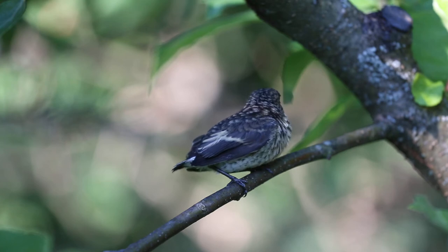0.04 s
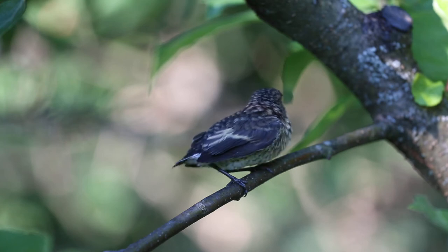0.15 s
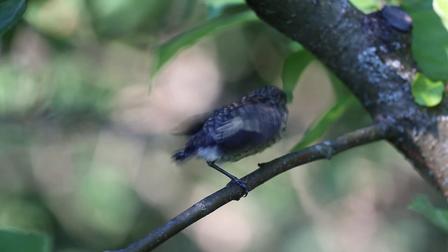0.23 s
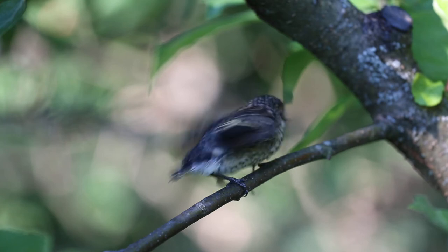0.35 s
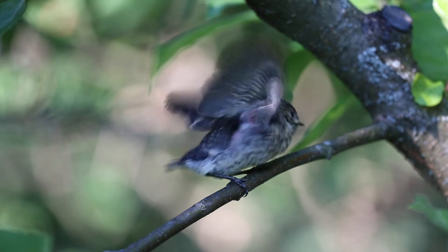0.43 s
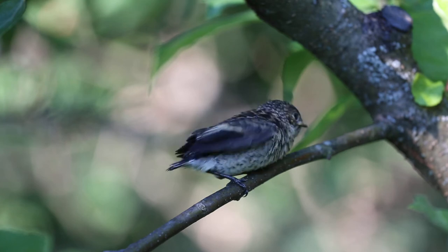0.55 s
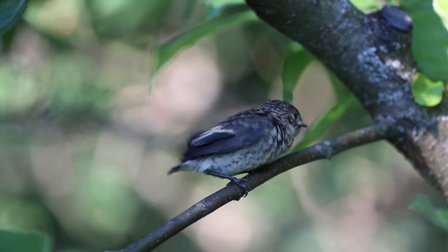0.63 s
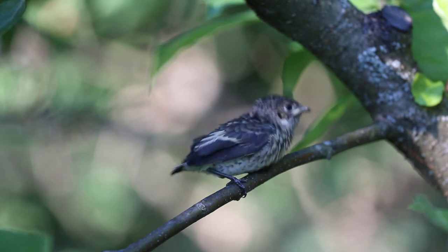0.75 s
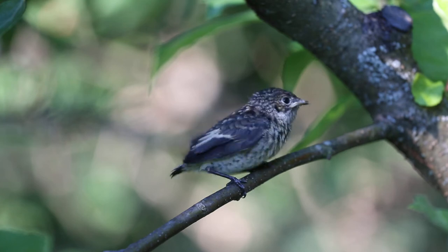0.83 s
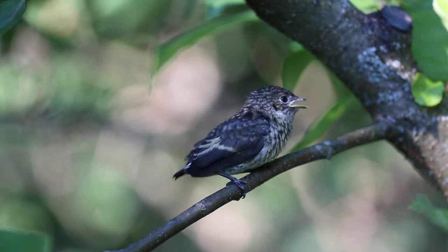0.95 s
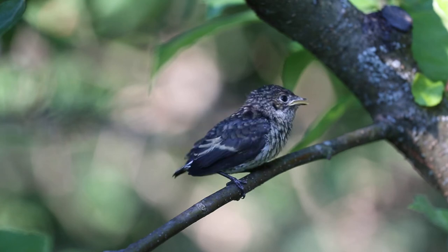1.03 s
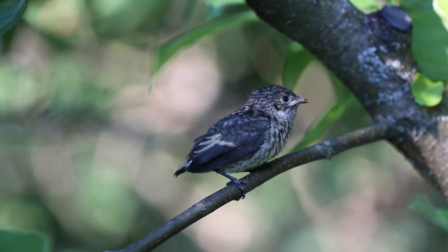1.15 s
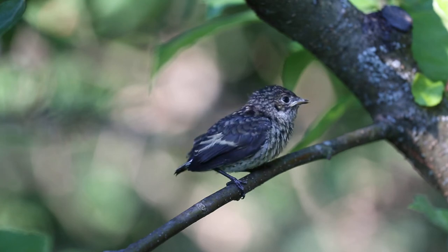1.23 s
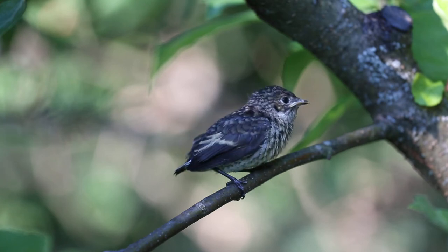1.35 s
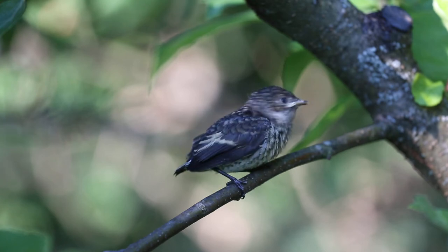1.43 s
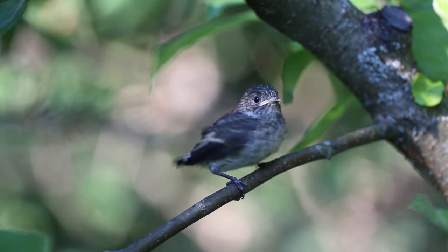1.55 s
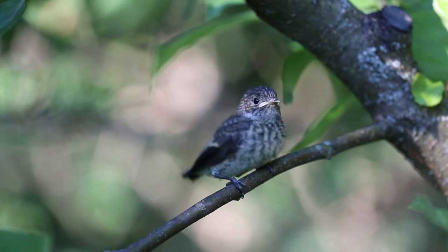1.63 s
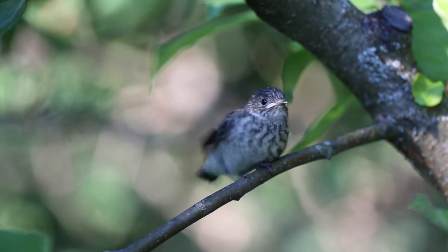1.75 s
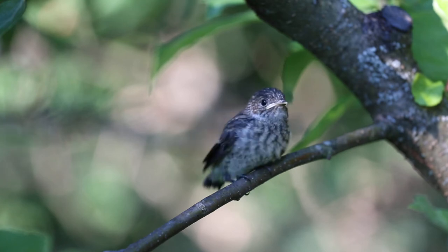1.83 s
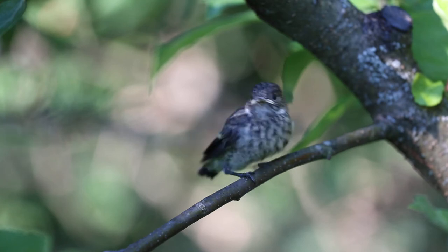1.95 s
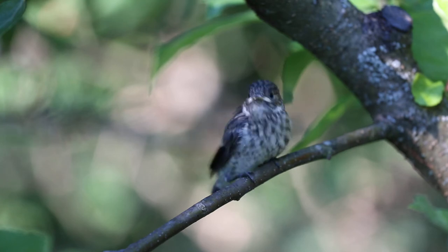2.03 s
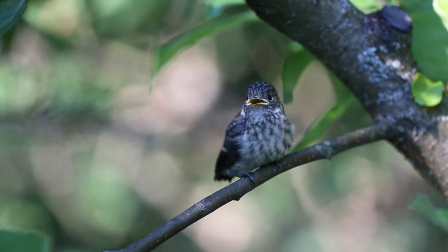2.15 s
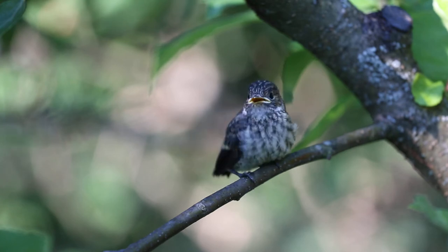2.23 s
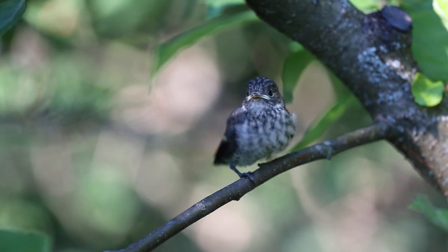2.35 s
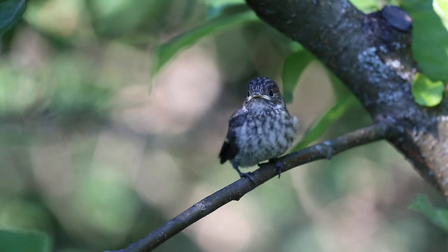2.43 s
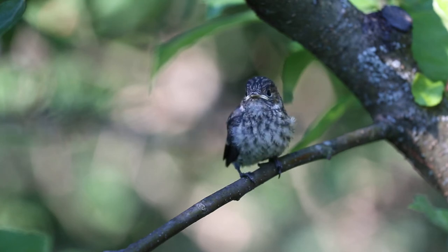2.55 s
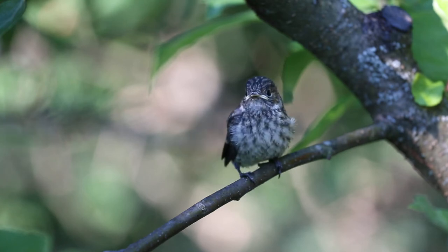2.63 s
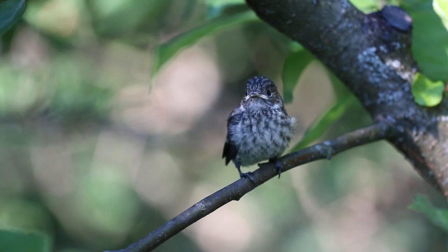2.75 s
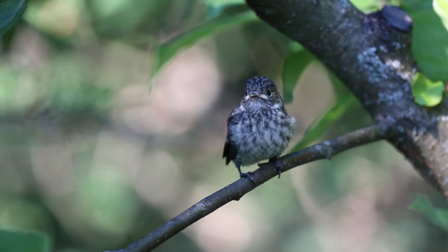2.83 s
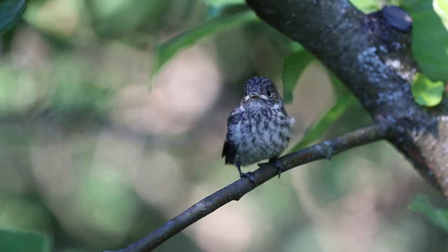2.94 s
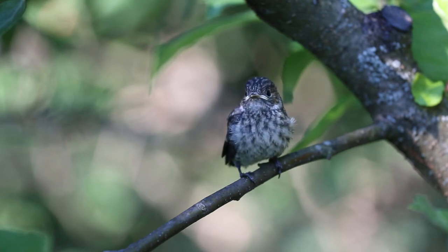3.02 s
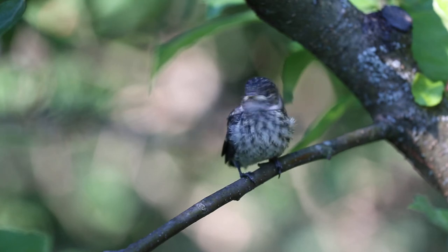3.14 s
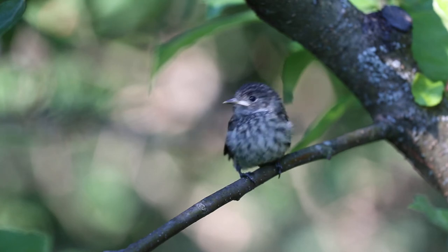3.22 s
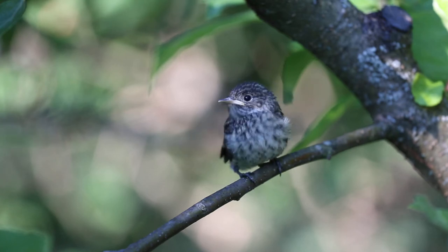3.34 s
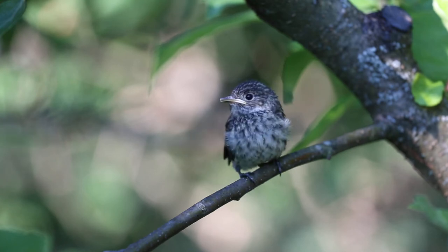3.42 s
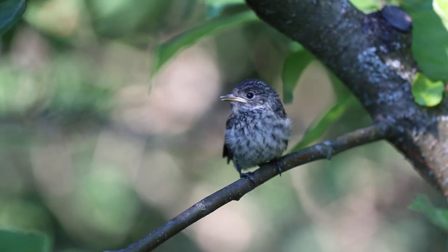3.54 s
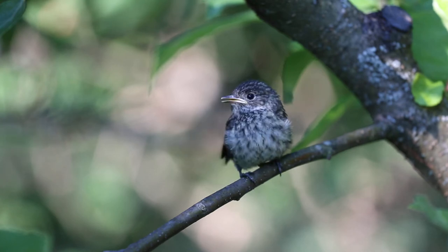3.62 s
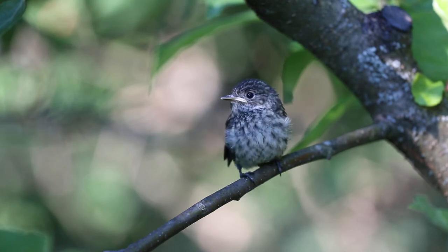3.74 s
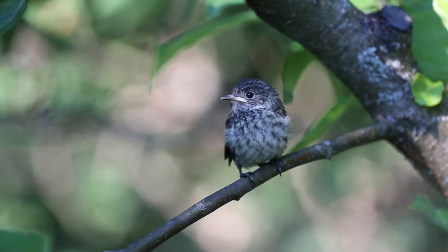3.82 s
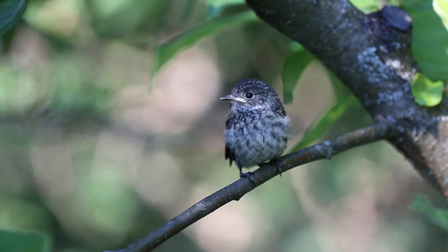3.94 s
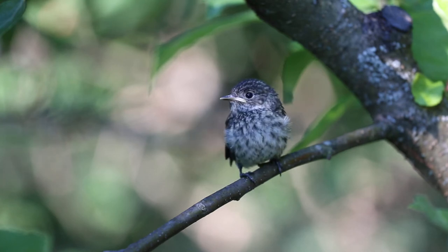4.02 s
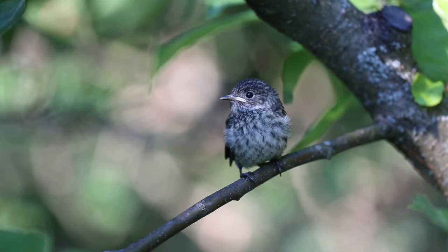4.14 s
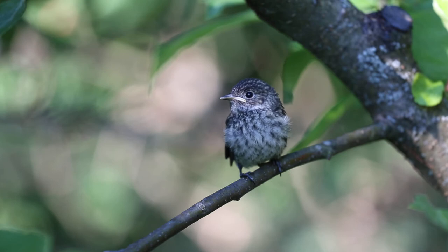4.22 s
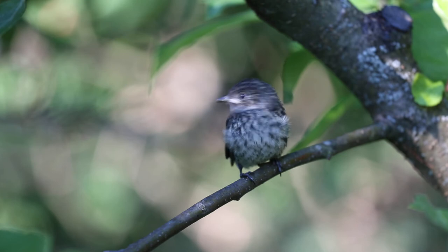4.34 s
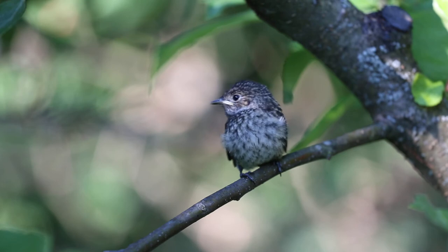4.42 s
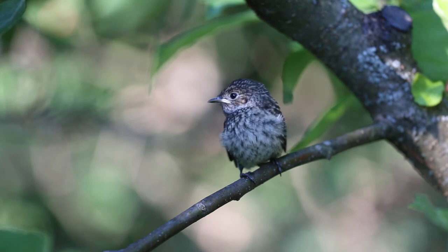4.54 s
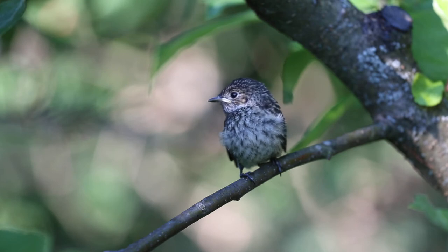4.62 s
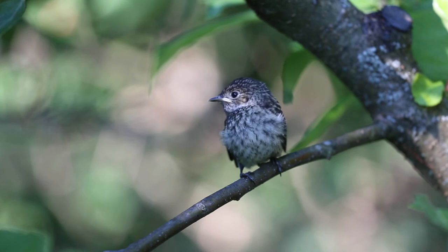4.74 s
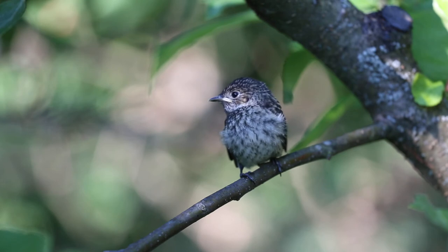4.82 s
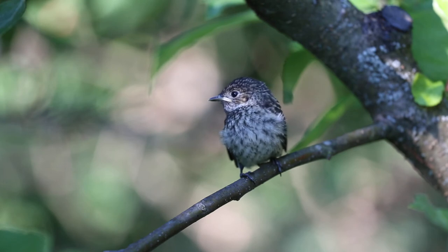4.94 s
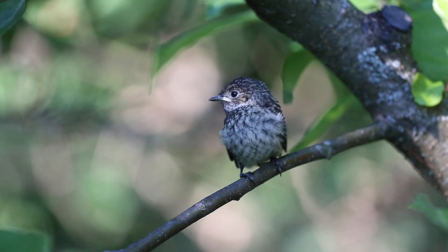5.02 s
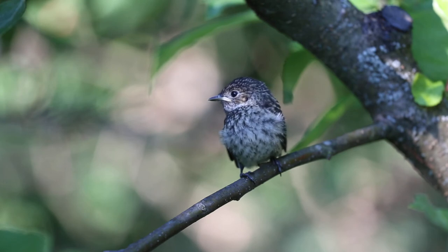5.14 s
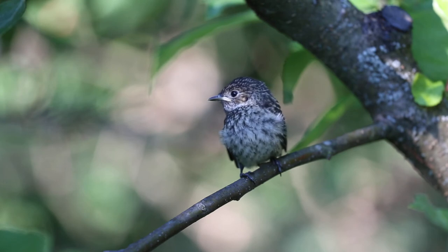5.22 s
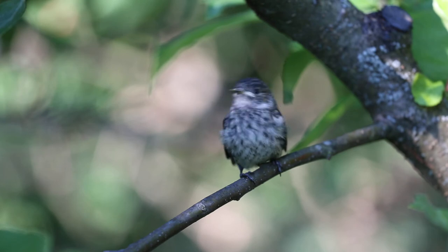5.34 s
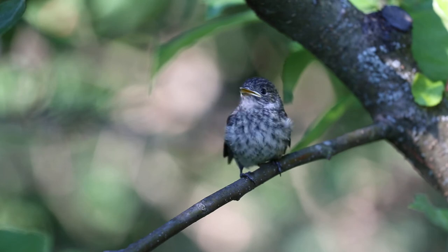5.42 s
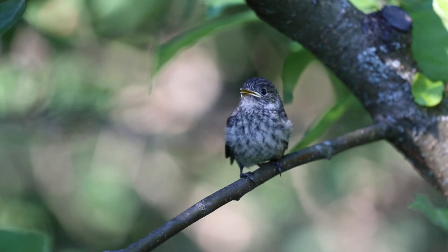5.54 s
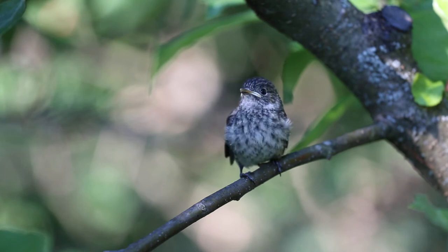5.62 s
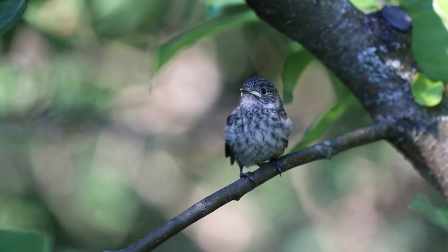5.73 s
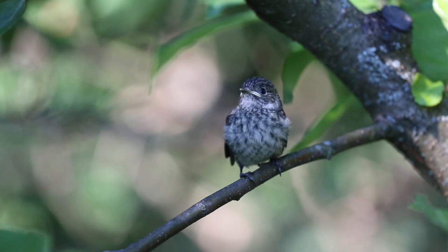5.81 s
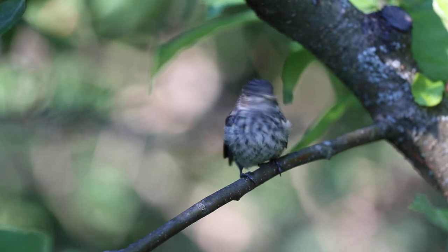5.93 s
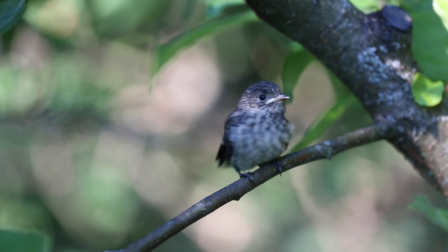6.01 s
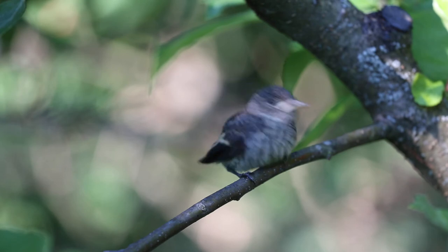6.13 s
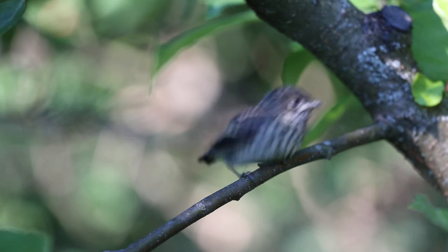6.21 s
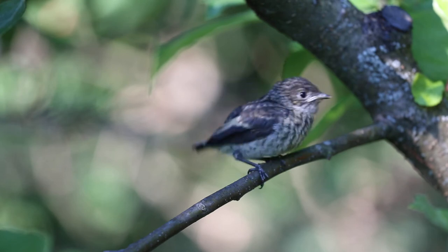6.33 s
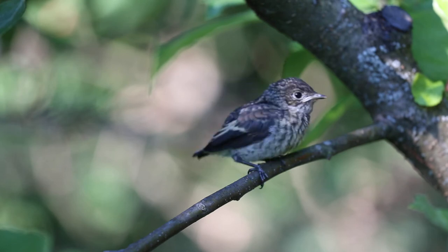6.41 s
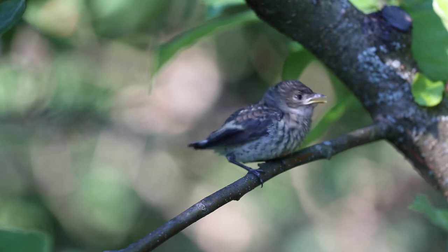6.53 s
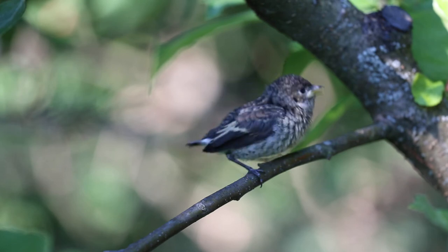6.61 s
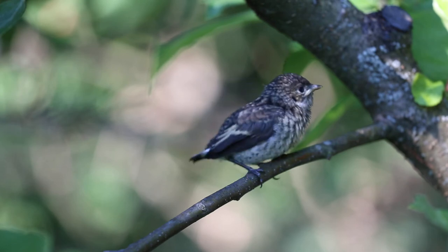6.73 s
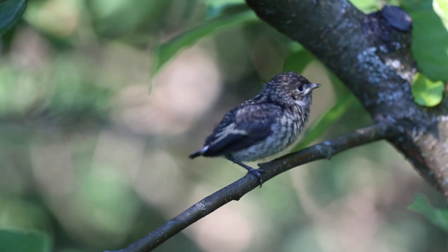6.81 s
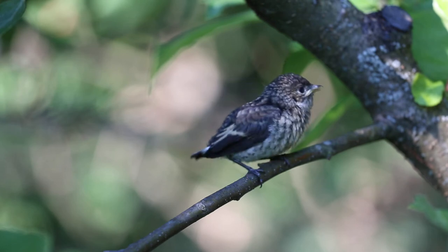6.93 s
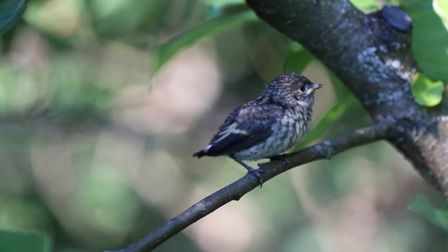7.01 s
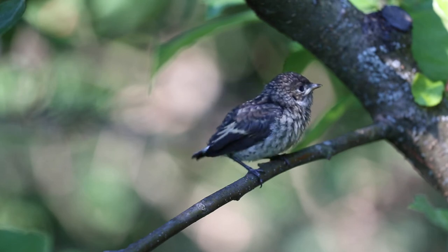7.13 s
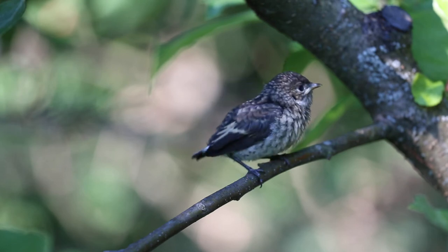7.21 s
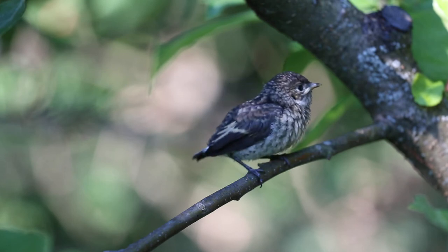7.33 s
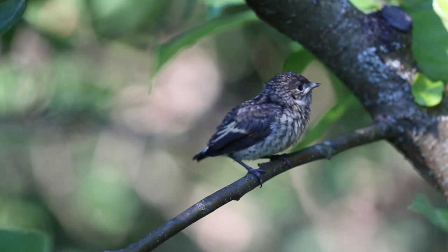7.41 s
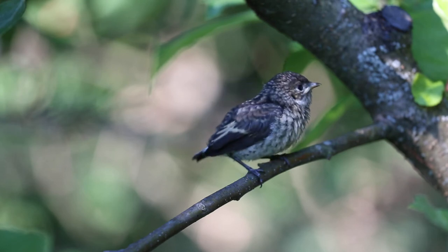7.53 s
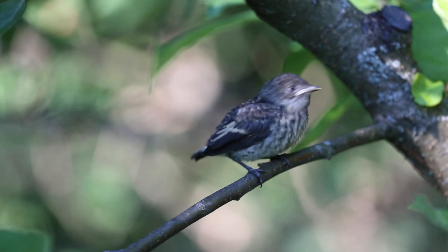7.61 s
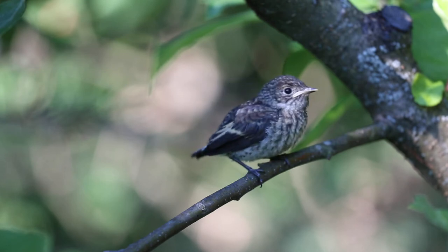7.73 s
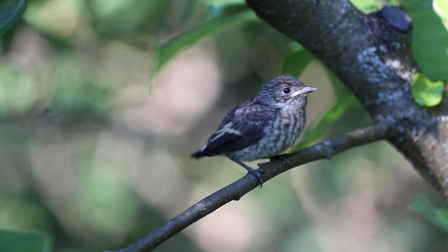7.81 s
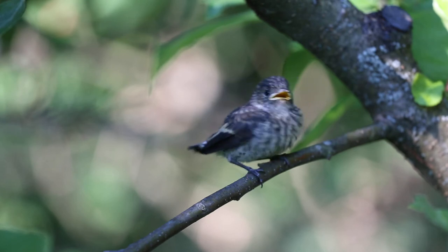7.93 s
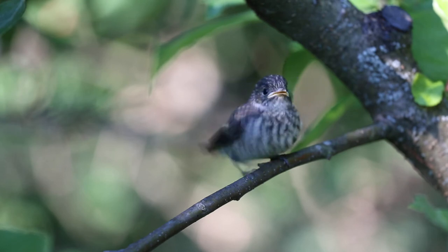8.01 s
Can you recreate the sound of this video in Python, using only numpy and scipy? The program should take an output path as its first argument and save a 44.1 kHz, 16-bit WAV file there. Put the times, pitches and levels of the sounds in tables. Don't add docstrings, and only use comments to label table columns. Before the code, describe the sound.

Woodland ambience with low traffic noise and a faint idling motor. A fledgling's piercing two-toned trill, under a fifth of a second long, sounds six times. After the first comes a faint distant metallic ring; around the second, a warbler's fast twittering, then another singer's blurred slurs. Later, tiny paired chips and a swelling far bird chorus accompany the last calls. The chick is close and crisp, everything else soft and reverberant.

```python
import sys
import numpy as np
from scipy import signal
from scipy.fft import rfft, irfft
from scipy.io import wavfile
from scipy.ndimage import uniform_filter1d

SR = 44100
rng = np.random.default_rng(int(sys.argv[2]) if len(sys.argv) > 2 else 0)


def invert_db(x):
    u = np.asarray(x, float) / 20
    return 10 ** u


def unload_audio(sound):
    columns = np.transpose(np.atleast_2d(sound))
    steps = np.round(np.clip(columns, -1, 1) * 32767)
    wavfile.write(sys.argv[1], SR, steps.astype(np.int16))


N = 355446

# (f/Hz, level per Hz/dB)
FLOOR = [(15, -49), (28, -15), (74, -7), (96, -8.5), (129, -9.5), (189, -3), (241, -5.5), (268, -7.5),
         (391, -1.5), (460, -7), (512, -7), (952, -10), (3770, -20.5), (8690, -23), (15700, -29.5)]
# (t/s, half-width/s,
# swell/dB)
SWELLS = [
    (1.4, 0.22, 2.5),
    (5.85, 0.24, 2.5),
    (6.9, 0.33, 1.5),
]
# (t/s, hum level/dB)
MOTOR = [(0, -68), (.34, -62), (.65, -74), (1.35, -64), (1.6, -74.5), (3.2, -63.5), (4.05, -69),
         (5.25, -59.5), (5.7, -63), (6.8, -59), (8.06, -59.5)]
# (t/s, length/s, start f/Hz, end f/Hz, level/dB)
FAR_CHICKS = [
    (0.112, 0.086, 7650, 8260, -51),
    (4.056, 0.14, 7190, 7255, -47.5),
    (4.357, 0.089, 8700, 8640, -50.5),
    (4.728, 0.094, 8300, 8330, -58),
]
# (t/s, length/s, f/Hz, level/dB)
FAR_WHISTLES = [
    (0.019, 0.097, 4180, -52.5),
    (3.242, 0.049, 4230, -48),
    (3.57, 0.13, 4200, -54),
    (3.34, .12, 4200, -60),
    (5.718, 0.034, 4230, -42.5),
    (5.769, 0.32, 4210, -63.5),
    (6.799, .2, 3800, -59),
]
# (t/s, length/s, start f/Hz, level/dB)
WARBLER_RISES = [
    (1.683, 0.008, 4700, -61),
    (2.47, 0.0093, 4900, -67),
    (1.724, 0.021, 4300, -60),
    (2.24, 0.058, 4390, -56),
    (2.343, 0.029, 4540, -52.5),
    (2.634, 0.04, 4650, -53),
    (3.133, 0.022, 4840, -55),
]
# (t/s, length/s, end f/Hz, level/dB)
WARBLER_DROPS = [(1.635, .016, 5450, -60), (2.042, .006, 5030, -64), (1.75, 0.013, 4600, -56),
                 (3.065, 0.0072, 4600, -56), (1.716, .006, 4900, -62), (2.424, 0.012, 5320, -50),
                 (2.62, 0.0078, 4830, -55), (2.665, .024, 3820, -60), (2.753, .007, 4600, -55.5),
                 (2.872, .005, 4740, -57), (3.154, 0.031, 3980, -57.5)]
# (t/s, length/s, foot f/Hz, level/dB)
WARBLER_ARCHES = [
    (1.964, .032, 4830, -57),
]
# (t/s, length/s, start f/Hz, end f/Hz, level/dB)
WARBLER_HOOKS = [
    (2.062, 0.042, 4500, 3550, -59),
    (2.514, 0.045, 4400, 3280, -61),
    (2.759, .042, 4640, 3950, -60),
]
# (t/s, length/s, start f/Hz, end f/Hz, level/dB)
WARBLER_SLURS = [(.162, 0.041, 3160, 2100, -59), (2.601, .011, 3080, 2700, -62),
                 (2.929, 0.022, 3730, 3130, -65), (2.6, .018, 6650, 6250, -59.5),
                 (3.013, 0.027, 3780, 3130, -61), (3.047, 0.014, 6570, 5900, -61),
                 (1.863, 0.013, 5450, 5650, -57), (1.7, .045, 5300, 5200, -66.5),
                 (1.667, .012, 4200, 4100, -64), (1.925, .013, 6300, 6750, -67),
                 (2.03, .014, 5720, 5800, -66.5), (3.039, .008, 3700, 4250, -64),
                 (3.21, .028, 4900, 4750, -66), (1.763, .012, 4550, 4550, -66),
                 (3.18, 0.018, 3600, 3200, -60), (1.915, 0.013, 2800, 3100, -66),
                 (1.69, 0.014, 6250, 6200, -68), (3.3, .008, 6300, 6700, -62),
                 (5.2, 0.013, 3500, 3500, -65), (3.099, 0.028, 3450, 3100, -63),
                 (3.084, 0.012, 5200, 4800, -55), (3.094, 0.019, 4800, 3900, -61),
                 (2.549, 0.022, 3150, 2800, -64)]
# (t/s, length/s, start f/Hz, level/dB)
WARBLER_FLICKS = [
    (2.879, 0.0294, 4700, -55.5),
]
# (t/s, gap/s, first level/dB, second level/dB, third over second harmonic/dB)
CHIPS = [
    (0.346, .048, -62.5, -61, 4),
    (.779, 0.058, -64, -64.5, 6),
    (4.53, .047, -61, -59.5, -3.5),
    (4.758, 0.052, -56.5, -57.5, -1),
    (5.187, 0.048, -56, -57, 3),
    (6.51, 0.048, -59, -59, 3),
    (6.997, .048, -59, -57.5, -3),
    (7.46, 0.051, -58, -60, -2.5),
    (7.855, 0.057, -57.5, -57.5, -3),
]
# (f/Hz, width/Hz, level/dB)
THROAT = [
    (6820, 650, 5.5),
    (7850, 1500, -2.5),
]
# (t/s, effort/dB, crest f/Hz, extra push of the high voice/dB)
EFFORT = [
    [(.912, -27.5, 7800, 8), (.928, -22, 7170, -0.5), (.948, -17, 7110, -0.5), (.972, -14, 7000, -3.5),
     (.999, -19, 6960, 2.5), (1.029, -19, 6840, -2), (1.06, -22.5, 6860, -1), (1.09, -26.5, 6360, -7)],
    [(2.152, -24, 8100, 2), (2.17, -17.5, 7290, 2), (2.189, -17.5, 7090, 0.5), (2.214, -15, 7110, 2.5),
     (2.242, -18, 6900, 2), (2.272, -20, 6990, -3.5), (2.304, -25, 6920, -5), (2.333, -20, 6290, -13)],
    [(3.574, -23, 8150, -1.5), (3.593, -26, 7340, -1.5), (3.609, -26, 7200, -1.5), (3.633, -24.5, 6990, 0),
     (3.654, -25.5, 7060, 1.5), (3.684, -25.5, 7050, -3), (3.713, -33, 6730, 0.5), (3.739, -29, 6350, -7)],
    [(5.433, -26, 8300, 4.5), (5.453, -24.5, 7350, -1), (5.475, -21.5, 7300, 1.5), (5.501, -17.5, 7020, 2),
     (5.527, -20, 7060, 2), (5.556, -20.5, 7030, -2.5), (5.587, -27, 6790, 0), (5.625, -34.5, 6430, -3)],
    [(6.549, -27, 8300, 2.5), (6.57, -18, 7340, -3), (6.593, -20, 7240, -1.5), (6.615, -23, 7200, 1.5),
     (6.644, -23.5, 6990, 0.5), (6.678, -30, 6800, -2), (6.698, -24.5, 6400, -5)],
    [(7.885, -15.5, 7920, 0), (7.902, -16.5, 7250, -6.5), (7.923, -15, 7210, -1), (7.949, -15, 7080, 2),
     (7.977, -15, 6960, -1.5), (8.008, -18.5, 6970, 0), (8.042, -26.5, 6780, -1), (8.062, -20.5, 6350, -7)],
]
# (first dip f/Hz, high over low voice ratio, high minus low/dB, octave tones/dB, difference tones/dB)
CALL_VOICES = [
    (6606, 1.173, -5.5, -32, -36.5),
    (6540, 1.169, -2.5, -36, -30),
    (6610, 1.156, -0.5, -26, -27.5),
    (6707, 1.144, -1.1, -31, -35),
    (6790, 1.152, -1, -28, -39),
    (6643, 1.135, -2, -34.5, -33.5),
]
# (low voice slackens in dips/dB, high voice/dB, fade on glides/dB, dips sink/Hz per s)
BREATH = [
    (9, 3, 2, 900),
    (11, 7, 2, 500),
    (2, 3, 9, 700),
    (9, 6, 2.5, 600),
    (2, 4, 3, 1500),
    (5, 2, 4, 800),
]
PIPE_HZ = [883, 1410, 1475, 1841, 2051, 2815, 2864, 3381, 3418, 3731, 4382, 4392, 5663, 5916, 5901, 7052,
           7860, 8177, 8185.5, 10450, 10500, 10590]
# (t/s, swell/s, steepness, peak level/dB)
PIPE = [(1.2, 0.15, 0.92, -61.5), (1.34, 0.067, 0.64, -63), (1.34, 0.061, 0.55, -60), (1.35, 0.11, .8, -66),
        (1.34, 0.053, 0.73, -56.5), (1.385, 0.047, 1.1, -58), (1.385, 0.05, 1.1, -55),
        (1.34, .06, 1.1, -60), (1.34, 0.087, 1.6, -55), (1.348, 0.079, 0.87, -47.5),
        (1.36, 0.036, 1.3, -50.5), (1.35, 0.12, 0.92, -60), (1.35, 0.09, 1.5, -48.5),
        (1.34, 0.09, 1.7, -36.5), (1.34, 0.056, 1.6, -44), (1.36, 0.085, 1.1, -41.5),
        (1.34, 0.044, 0.88, -52), (1.29, .16, 3, -49), (1.29, .16, 3, -51), (1.38, 0.055, 1.6, -61),
        (1.41, 0.045, 1.3, -57), (1.7, 0.051, 1.9, -73)]
# (f/Hz, level/dB)
ROD = [(882.9, -73), (4587, -63), (5319, -62), (5421, -56.5), (6541, -70.5), (6735, -74.5), (6853, -73.5),
       (7176, -70), (7822, -71), (7843, -65), (10395, -74), (11639, -73), (14616, -73), (15143, -76)]
# (t/s, level/dB, centre f/Hz, spread of pitch as a share)
CHORUS = [(1.5, -83, 5310, .12), (1.7, -58, 5221, .12), (2.6, -58.5, 4613, .15), (3.4, -58, 3432, .18),
          (3.9, -62, 3000, .18), (4.5, -72.5, 2887, .15), (6.7, -65, 3880, .06), (6.95, -57, 3800, .08),
          (7.2, -56, 3202, .22), (7.55, -52, 4410, .18), (7.78, -48.5, 4916, .12), (7.85, -46, 3797, .12),
          (8.06, -50.5, 4040, .17)]
# (t/s, f/Hz, time to fall 60 dB/s, level/dB)
TICKS = [
    (7.8, 130, .25, -46),
    (2.219, 4800, .004, -33),
    (2.171, 10000, .003, -36),
    (6.715, 830, .12, -52),
    (5.99, 860, .15, -54),
    (6.04, 760, .15, -54),
]
# (t/s, length/s, start f/Hz, end f/Hz, level/dB)
FAR_HOOKS = [
    (4.085, 0.032, 4460, 4170, -67),
]
# (t/s, length/s, start f/Hz, end f/Hz, level/dB)
FAR_SLURS = [(3.22, .021, 3530, 2670, -62.5), (3.256, 0.032, 4500, 2650, -61.5),
             (3.377, 0.029, 3100, 3940, -62.5), (3.422, 0.0217, 3100, 2500, -67),
             (3.463, .03, 3300, 3150, -66), (3.85, .05, 2600, 3400, -69.5), (3.612, .022, 3100, 2100, -69),
             (3.808, .018, 2950, 2100, -62.5), (3.445, .024, 2150, 3300, -64.5),
             (3.4, 0.039, 3850, 3520, -68), (3.765, 0.02, 2950, 3850, -61),
             (3.579, 0.0187, 3200, 4050, -60.5), (3.596, 0.018, 4500, 3170, -63),
             (3.627, .039, 2080, 3810, -63), (3.66, .012, 3100, 2200, -68), (3.67, 0.014, 2900, 3400, -69),
             (3.695, .015, 3200, 3100, -73), (3.788, 0.021, 3850, 2900, -60),
             (3.683, 0.011, 4580, 4000, -56), (3.825, .037, 2100, 3450, -66),
             (3.87, 0.057, 3620, 2410, -80), (4.03, 0.045, 2560, 3320, -74),
             (4.089, 0.028, 3190, 2200, -67), (4.2, 0.065, 3950, 2500, -66.5),
             (4.05, 0.044, 2950, 3100, -68), (4.26, .03, 2450, 2150, -65), (4.3, 0.037, 2350, 2060, -67.5),
             (3.69, .02, 3300, 3300, -72)]
# (lowest f/Hz, extra loudness needed/dB)
MASKED = [
    (9450, 3),
    (9800, -2),
    (10150, -1),
    (10500, 1.5),
    (10850, 4),
    (11200, 6),
]
# (t/s, lowest f hit/Hz, share of bands lost)
STARVED = [(.5, 1500, .5), (.52, 1000, .7), (.735, 1800, .4), (1.1, 1800, .9), (1.116, 1800, .9),
           (6.549, 11500, .4), (2.635, 1400, .6), (3.4, 2000, .45), (3.786, 1500, .45), (3.915, 1500, .6),
           (4.0, 1200, .55), (4.3, 1200, .5), (4.72, 2000, .55), (6.345, 1500, .55), (6.39, 2500, .4),
           (6.92, 1500, .5), (7.24, 1800, .5), (7.325, 2200, .45), (8.03, 500, .6)]


def rms_one(x):
    return x / np.sqrt(np.mean(x ** 2) + 1e-20)


def in_time(rows):
    s, *columns = np.transpose(rows)
    return [np.interp(np.arange(N) / SR, s, c) for c in columns]


def drift(rate):
    r = np.exp(-2 * np.pi * rate / SR)
    noise = rng.standard_normal(N + SR)
    return rms_one(signal.lfilter([1], [1, -2 * r, r * r], noise)[SR:])


def add(out, s, sound):
    i = round(s * SR)
    out[i:i + len(sound)] += sound[:N - i]


def turns(hz):
    return 2 * np.pi * np.cumsum(hz) / SR


def filtered(x, order, hz, kind="low"):
    return signal.sosfilt(signal.butter(order, hz, kind, fs=SR, output="sos"), x)


def resonance(x, hz, width_hz):
    r = np.exp(-np.pi * width_hz / SR)
    poles = [1, -2 * r * np.cos(2 * np.pi * hz / SR), r * r]
    return signal.lfilter([(1 - r * r) / 2, 0, (r * r - 1) / 2], poles, x + 1e-18)


def ring(clicks, hz, t60):
    r, w = invert_db(-60 / (t60 * SR)), 2 * np.pi * hz / SR
    return signal.lfilter([0, np.sin(w)], [1, -2 * r * np.cos(w), r * r], clicks + 1e-18)


def trees(x, onset_s, t60):
    t = np.arange(SR) / SR
    tail = rng.standard_normal(SR) * invert_db(-60 * t / t60) * (1 - np.exp(-t / onset_s))
    return signal.fftconvolve(x, tail / np.sqrt(np.sum(tail ** 2)))[:N]


def blur(x):
    return .95 * x + .4 * trees(x, 0.0027, 0.051)


def background():
    t = np.arange(N) / SR
    swell_db = sum(db * np.exp(-((t - s) / width) ** 2) for s, width, db in SWELLS)
    traffic_db = -53.5 + swell_db
    leaves_db = -65.5 + 0.18 * swell_db
    hum_db, = in_time(MOTOR)

    hz = np.maximum(np.arange(N // 2 + 1) * SR / N, 1)
    floor_hz, floor_db = np.transpose(FLOOR)
    colour = invert_db(np.interp(np.log(hz), np.log(floor_hz), floor_db))
    noise = rms_one(irfft(rfft(rng.standard_normal(N)) * colour, N))
    traffic = filtered(noise, 2, 2000) * invert_db(traffic_db + 1.5 + 1.2 * drift(13.0))
    leaves = filtered(noise[::-1], 2, 2000, "high") * invert_db(leaves_db + 17)
    hum = np.sin(turns(107.7 + 1.27 * drift(1.3))) * invert_db(hum_db + 2.2 * drift(4))
    return traffic + leaves + hum


def far_chicks():
    trill_rate_hz, depth_khz = 42, 2.37
    chick_ratio, whistle_ratio = 1.09, 1.025
    calls = [(*row, chick_ratio) for row in FAR_CHICKS]
    calls += [(s, length, hz, hz, db, whistle_ratio) for s, length, hz, db in FAR_WHISTLES]
    out = np.zeros(N)
    for s, length, start, end, db, ratio in calls:
        u = np.linspace(0, 1, round(length * SR))
        trilling = np.cos(2 * np.pi * trill_rate_hz * length * u)
        hz = start + (end - start) * u + 1000 * depth_khz * (ratio - 1) * trilling
        voices = np.sin(turns(hz)) + 0.7 * np.sin(turns(ratio * hz))
        add(out, s, invert_db(db) * np.abs(np.sin(np.pi * u)) ** .5 * voices)
    return out


def glides(rows, bend):
    return [(s, length, start, (start + end) / 2 + bend * abs(end - start), end, db)
            for s, length, start, end, db in rows]


def whistle(notes):
    out = np.zeros(N)
    for s, length, start, middle, end, db in notes:
        u = np.linspace(-1, 1, round(length * SR))
        hz = middle + (end - start) / 2 * u + ((start + end) / 2 - middle) * u ** 2
        add(out, s, invert_db(db + 10.5) * (1 - u ** 2) ** 0.33 * np.sin(turns(hz)))
    return out * invert_db(1.2 * drift(80))


def warbler():
    top_hz, tilt = 5770, 0.052
    arches = [(s, length, hz * (1 + tilt), top_hz, hz * (1 - tilt), db) for s, length, hz, db in WARBLER_ARCHES]
    drops = [(s, length, top_hz, hz, db) for s, length, hz, db in WARBLER_DROPS]
    rises = [(s, length, hz, top_hz, db) for s, length, hz, db in WARBLER_RISES]
    flicks = [(s, length, hz, top_hz, db) for s, length, hz, db in WARBLER_FLICKS]
    rising = arches + glides(flicks, .45) + glides(rises, 0.18)
    falling = glides(WARBLER_HOOKS, .42) + glides(drops, -0.177)
    return whistle(rising + falling + glides(WARBLER_SLURS, 0))


def chipper():
    chip_hz, reply_hz, hz_per_db = 1542, 1457, 10.5
    chips = [(s, chip_hz, db, tilt) for s, gap, db, _, tilt in CHIPS]
    chips += [(s + gap, reply_hz, db, tilt) for s, gap, _, db, tilt in CHIPS]
    out, u = np.zeros(N), np.linspace(0, 1, round(0.0206 * SR))
    for s, hz, db, tilt_db in chips:
        tilt = invert_db(tilt_db)
        phase = turns((hz + hz_per_db * (db + 58)) * (1.07 - 0.213 * u))
        stack = np.sin(2 * phase) / tilt ** .5 + tilt ** .5 * np.sin(3 * phase)
        stack += 0.25 * tilt * np.sin(4 * phase) + 0.22 * tilt * np.sin(5 * phase)
        add(out, s, invert_db(db + 8.0) * np.sin(np.pi * u) * stack)
    return out


def trill(effort, dip_hz, high_db, sag_hz):
    s, low_db, crest, push_db = np.transpose(effort)
    dip = dip_hz - sag_hz * (s - s[0])
    dip[0] += 180
    return s, crest, dip, low_db, low_db + high_db + push_db


def fledgling():
    dip_share, attack_s, lead_s = 0.612, 0.012, .004
    crest_sharpness = 1.35
    pulse_end, pulse_rise = .6, .62
    onset_closeness, closing_per_s = .07, .12
    tones, extra = np.zeros(N), np.zeros(N)
    waver_hz = 25 * drift(250)
    flutters = [invert_db(1.8 * drift(140)) for side in range(2)]
    patches = [invert_db(3 * drift(50) + 3 * drift(200) - 1) for tone in range(3)]

    for effort, voices, breath in zip(EFFORT, CALL_VOICES, BREATH):
        dip_hz, ratio, lean_db, overtone_db, mixing_db = voices
        slack_db, high_slack_db, glide_db, sag_hz = breath
        s, crest, dip, low_db, high_db = trill(effort, dip_hz, lean_db, sag_hz)
        span = np.arange(round((s[0] - lead_s) * SR), min(round(s[-1] * SR), N))
        t = span / SR
        beat = np.interp(t, s, np.arange(len(s)))
        begun = np.clip(beat, 0, 1)

        knots = np.sort(np.r_[s, s[:-1] + dip_share * np.diff(s)])
        step = np.interp(t, knots, np.arange(len(knots)))
        height = (.5 + .5 * np.cos(np.pi * step)) ** crest_sharpness
        eased = np.floor(step) + np.where(step % 2 < 1, 1 - height, height)
        hz = np.interp(eased, np.arange(len(knots)), np.c_[crest, dip].ravel()[:-1])
        closeness = onset_closeness * np.clip(1 - 2 * beat, 0, 1)
        high_ratio = ratio - closeness + closing_per_s * (.08 + t[0] - t)
        a = turns(hz + waver_hz[span])
        b = turns(high_ratio * hz - waver_hz[span])

        edge = np.clip((t - t[0]) / attack_s, 0, 1) ** 2 * np.clip((s[-1] - t) / 0.0021, 0, 1)
        edge = edge * invert_db(-glide_db * (4 * height * (1 - height)) ** 2.5 * begun)
        pulse = np.interp((beat - pulse_end) % 1, [0, pulse_rise, 1], [0, .5, 1])
        slack = abs(np.cos(np.pi * pulse)) ** 2.7 * begun
        throb = invert_db(-slack_db * slack)
        flutter, high_flutter = [f[span] for f in flutters]
        low = invert_db(np.interp(t, s, low_db) + 4.5) * edge * throb * flutter
        high = invert_db(np.interp(t, s, high_db) + 8.0) * edge * invert_db(-high_slack_db * slack) * high_flutter
        both = np.sqrt(low * high)
        tones[span] = low * np.sin(a) + high * np.sin(b)

        low_patch, sum_patch, high_patch = [p[span] for p in patches]
        overtones = low * low_patch * np.sin(2 * a) + .6 * both * sum_patch * np.sin(a + b)
        overtones += .3 * high * high_patch * np.sin(2 * b) + .22 * both * np.sin(3 * a - b)
        extra[span] += invert_db(overtone_db) * overtones
        extra[span] *= np.clip((s[-1] - t) / .03, 0, 1) / np.sqrt(throb)
        below = resonance(resonance(np.sin(2 * a - b), 5550, 450), 5550, 450)
        differences = 1.08 * below + np.sin(2 * b - a)
        extra[span] += invert_db(mixing_db) * both * differences * high_flutter / np.sqrt(throb) * begun

    voiced = sum(invert_db(db) * resonance(tones, hz, width) * np.sign(7400 - hz) for hz, width, db in THROAT)
    return filtered(voiced, 8, 6350, "high") + extra


def pipe():
    out, now = np.zeros(N), np.arange(N) / SR
    for hz, (s, swell, steepness, db) in zip(PIPE_HZ, PIPE):
        u = np.arange(SR) / SR / swell
        level = invert_db(db + 3.5 + 2.0 * drift(16)[:SR])
        add(out, s, level * (u * np.exp(1 - u)) ** steepness * np.sin(2 * np.pi * hz * swell * u))
    out *= invert_db(1.5 * drift(14))
    scrape = rng.standard_normal(N) * np.interp(now, [1.18, 1.2, 1.33, 1.4], [0.042, 0.77, 1.0, 0.046])
    out += sum(invert_db(db + 32.0) * resonance(scrape, hz, 40) for hz, db in ROD)
    clank = rng.standard_normal(N) * np.interp(now, [1.343, 1.36, 1.45, 1.6], [0.0081, 1, 0.63, 0])
    return out + invert_db(-31.0) * resonance(clank, 1470, 370) + invert_db(-43.0) * resonance(clank, 2900, 2500)


def chorus():
    level_db, hz, spread = in_time(CHORUS)
    voices = np.zeros(N)
    for bird in range(12):
        voices += invert_db(3.1 * drift(5.2)) * np.sin(turns(hz * np.exp(spread * drift(14))))
    return invert_db(level_db) * rms_one(filtered(voices, 8, 5700))


def ticks():
    return sum(invert_db(db) * ring(signal.unit_impulse(N, round(s * SR)), hz, t60) for s, hz, t60, db in TICKS)


def far_singer():
    return blur(whistle(glides(FAR_HOOKS, .42) + glides(FAR_SLURS, 0)))


def scene():
    floor = background()
    far = trees(far_chicks() + chorus(), 0.0029, 0.6)
    middle = warbler() + blur(chipper())
    middle = invert_db(.5) * middle + invert_db(-6) * trees(middle, .015, .5)
    chick = fledgling()
    near = chick + invert_db(-9.5) * trees(chick, .004, .065) + invert_db(-19.5) * trees(chick, 0.011, 0.44)
    metal = pipe()
    metal = metal + invert_db(-9.0) * trees(metal, 0.018, 0.25)
    beyond = far_singer()
    beyond = invert_db(1) * beyond + invert_db(1) * trees(beyond, .02, .4)
    return (near + middle + metal + beyond + far + ticks() + floor)[None]


def mask(x):
    hop, loud_db = 1024, -19
    loud = 10 * np.log10(uniform_filter1d(x ** 2, size=1500) + 1e-12)[::hop]
    out = x.copy()
    for low_hz, harder_db in MASKED:
        sos = signal.butter(4, [low_hz, low_hz + 500], "band", fs=SR, output="sos")
        band = signal.sosfiltfilt(sos, out)
        lost = loud + rng.normal(0, 2, len(loud)) > loud_db + harder_db
        nearest = np.minimum((np.arange(N) + hop // 2) // hop, len(lost) - 1)
        out -= band * uniform_filter1d(1. * lost[nearest], size=300)
    return out


def starve(x):
    size, spare_db, left_db = 1280, -22, -20
    out = x.copy()
    window = signal.windows.tukey(size, .9)
    band = np.arange(size // 2 + 1) // 9
    hz = np.arange(size // 2 + 1) * SR / size
    chance = rng.random((len(STARVED), band[-1] + 1))
    for (s, low_hz, share), luck in zip(STARVED, chance):
        i = min(round(s * SR) - size // 2, N - size)
        bins = rfft(out[i:i + size] * window)
        power = np.bincount(band, abs(bins) ** 2)
        weak = power < invert_db(2 * spare_db) * power[20:].max() + 30 * np.median(power)
        unlucky = luck < share * np.linspace(.8, 2, len(luck))
        lost = (unlucky & weak)[band] & (hz > low_hz)
        out[i:i + size] -= (1 - invert_db(left_db)) * irfft(bins * lost, size)
    return out


def roll_off(x):
    return signal.sosfilt(signal.butter(12, 15870, fs=SR, output="sos"), x)


def record(dry):
    cut = signal.sosfilt(signal.ellip(12, .5, 70, 15850, fs=SR, output="sos"), dry[0])
    mix = starve(mask(cut))[None]
    return roll_off(mix)


dry = scene()
out = record(dry)
unload_audio(out)
```